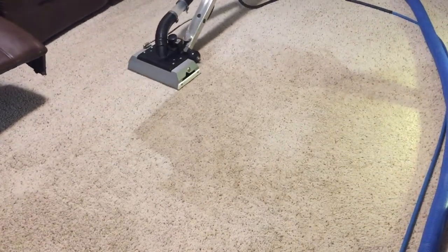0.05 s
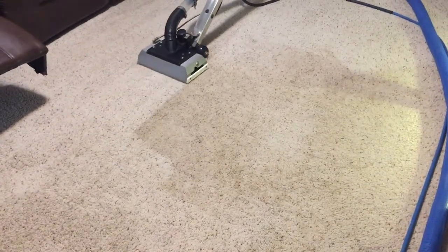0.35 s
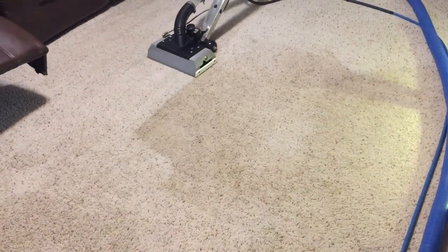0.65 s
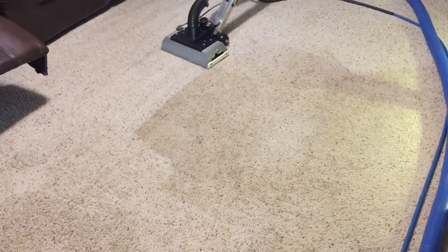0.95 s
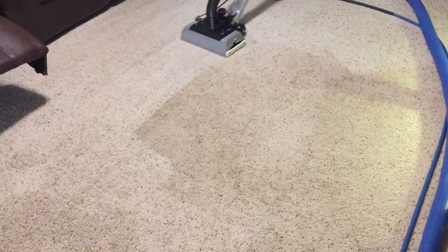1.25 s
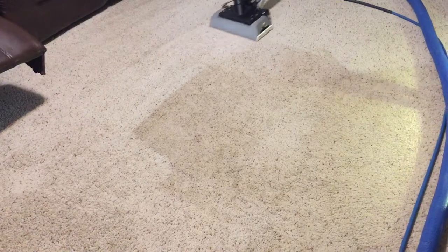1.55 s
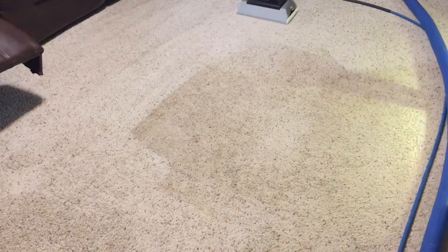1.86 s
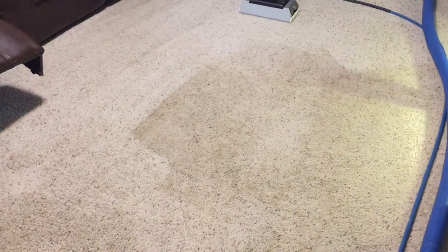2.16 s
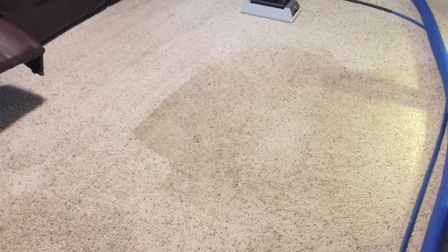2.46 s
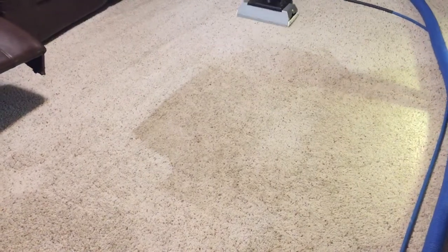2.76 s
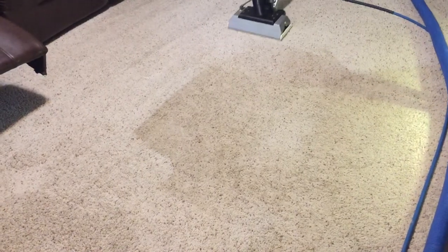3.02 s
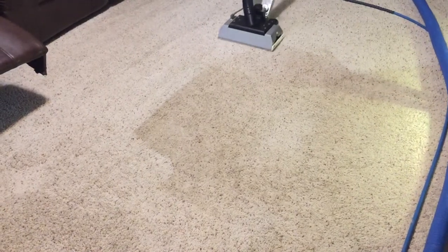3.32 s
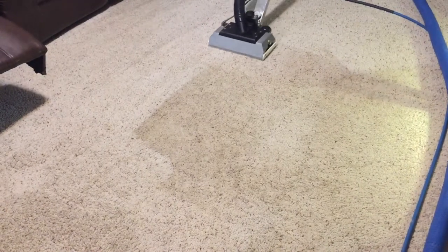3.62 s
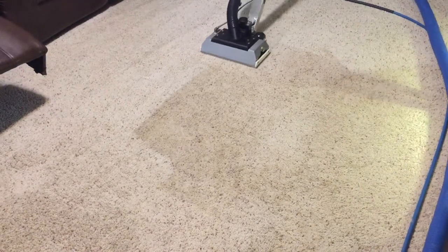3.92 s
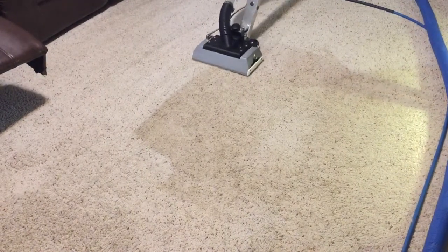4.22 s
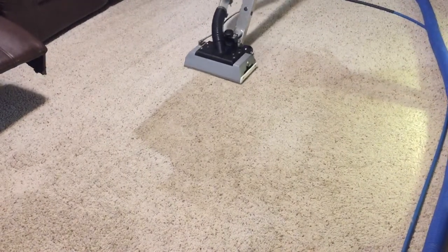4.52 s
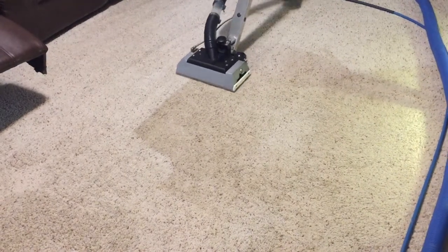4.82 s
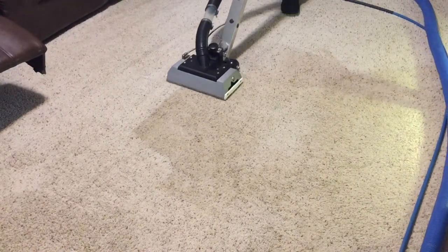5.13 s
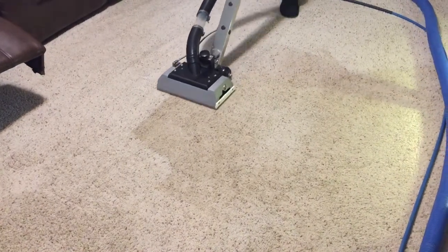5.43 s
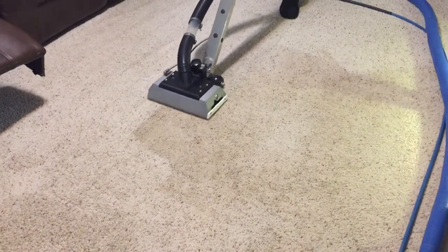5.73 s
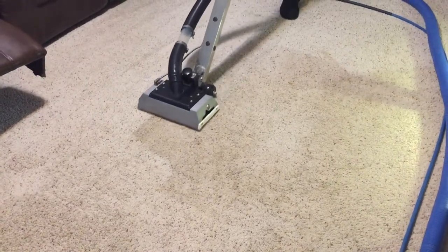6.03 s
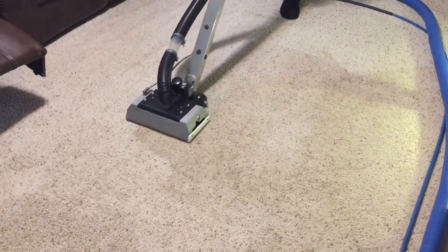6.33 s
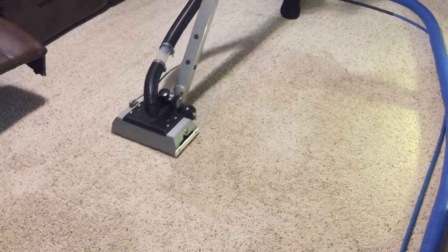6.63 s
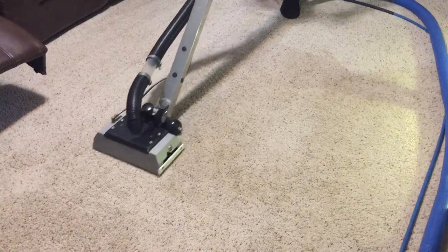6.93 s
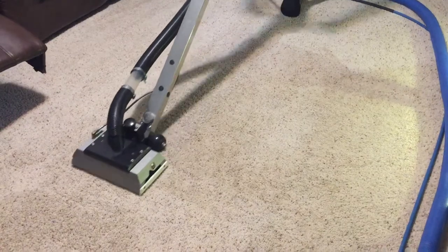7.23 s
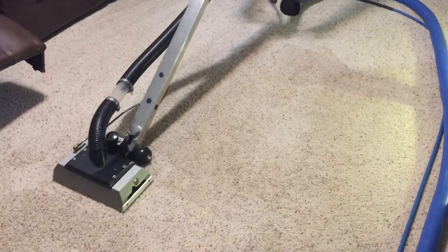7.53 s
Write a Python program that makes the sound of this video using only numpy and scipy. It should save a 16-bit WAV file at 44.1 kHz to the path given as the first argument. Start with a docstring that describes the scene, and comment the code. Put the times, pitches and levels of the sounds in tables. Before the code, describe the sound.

A carpet cleaning machine runs indoors with a loud, steady, throbbing motor hum. High turbine whines swell and fade above it, while air roars into the wand with a fine spray hiss and thin whistles. About two seconds in, the suction chokes briefly on the carpet, then breaks through in two quick slurps. Near the end a faint low groan joins as the head comes closer. Heard from one spot in the room.

```python
"""A carpet extractor's pump motor hums loudly, throbbing against the shake of the brush drive.
Three vacuum turbines whine, swelling and fading in the room, over a faint cooling fan.
Air roars into the nozzle with a fine spray and thin whistles as the wand is drawn back. It chokes as
the nozzle seals on the pile, then breaks through in two slurps as the wand is pushed towards the
listener. A low groan rises as the head comes near."""
import sys
import numpy as np
from scipy import signal
from scipy.fft import rfft, irfft, next_fast_len
from scipy.io import wavfile
from scipy.ndimage import uniform_filter1d, map_coordinates

SR = 44100
rng = np.random.default_rng(int(sys.argv[2]) if len(sys.argv) > 2 else 0)


def wav_out(sig):
    """Save sig, one row per channel (or a flat mono array), as 16-bit PCM at SR to the path in sys.argv[1]."""
    wavfile.write(sys.argv[1], SR, np.round(np.clip(np.atleast_2d(sig).T, -1, 1) * 32767).astype(np.int16))


N = 342657
TIME = np.arange(N) / SR

# the wand's stroke (time [s], distance of the head [m])
STROKE = [(0, 2.3), (1, 2.5), (2.1, 3.2), (2.75, 3.6), (4, 2.14), (6.5, 1.9), (7.5, 1.38), (7.77, 1.5)]
# faint partials of the hum
# (multiple of its pitch, level at mid stroke [dB], gain per halving of distance [dB], fade depth [dB])
HUM_PARTIALS = [(.5, -50, 5, 1.5), (2, -50, 2, 1.0), (3, -45.5, -3, 1.86), (3.5, -62, -3, 0),
                (4, -52, 10.5, 1.8), (5, -55, 5, 1.5)]
# brush drive partials (multiple of the turning rate, level [dB])
BRUSH_PARTIALS = [(5, -49), (6, -59), (8, -38), (10, -53), (11, -42.5), (13, -54.5), (14, -59.5),
                  (16, -51.5), (18, -53.5), (19, -62.5), (21, -40.5), (22, -40.5), (23, -50), (24, -50.5),
                  (25, -58.5)]
# shared swell of the main and third turbines' blade tones (time [s], base level [dB])
BLADE_SWELL = [(0, -49), (.4, -57), (.8, -49), (2.5, -48.5), (3.5, -51.5), (4.8, -55), (5.35, -50.5),
               (6.15, -58), (6.85, -48), (7.77, -49.5)]
# the main turbine's whine, an octave above its blade tone (time [s], base level [dB])
WHINE_SWELL = [(0, -55), (.6, -52), (1.17, -44.5), (1.3, -53), (1.57, -41.5), (1.95, -60), (2.23, -44.5),
               (2.85, -43), (3.05, -66), (3.32, -39), (3.55, -60), (3.72, -44.5), (4.2, -58), (4.95, -46.5),
               (5.5, -45), (6.15, -46), (7.45, -45), (7.72, -41)]
# turbine harmonics (multiple of the blade tone, base level [dB])
MAIN_OVERTONES = [(3, -60.5), (5, -55), (6, -71), (8, -67.5), (10, -68)]
SECOND_PARTIALS = [(1, -52.5), (2, -53), (3, -64.5), (4, -65.5)]
THIRD_OVERTONES = [(2, -56.5)]
# the fan tone rings out (start [s], time until release [s], boost [dB])
FAN_SWELLS = [(1.136, 0.43, 8), (3.5, 0.36, 9), (4.95, 0.22, 8), (7.4, 0.17, 8)]
# EQ curves of the air layers, dark to bright (frequency [Hz], relative level [dB])
BOOM_EQ = [(25, -25), (36, -17), (46, -10.5), (70, -2.5), (110, -6.5), (160, -3), (205, -3.5), (250, -1.5),
           (282, 1), (320, -7), (390, -6.5), (490, -15), (650, -15.5), (1000, -39)]
ROAR_EQ = [(350, -28), (520, -8), (620, 0.5), (1000, -2), (1500, -1.5), (2000, -2), (2500, -6), (3500, -18)]
RUSH_EQ = [(1500, -14.5), (2100, -0.5), (2600, -1), (3400, 0), (3900, -2), (4500, -3), (4900, -7),
           (5400, -5.5), (6500, -17.5), (8000, -25)]
HISS_EQ = [(4200, -19), (5000, -9.5), (5500, -1), (6600, 0.5), (7200, -2), (7750, -4), (8400, -3.5),
           (9500, -12.5), (10400, -16)]
SPRAY_EQ = [(7000, -24), (7800, -7), (8500, 3), (9600, 3), (10000, -0.5), (10400, -3.5), (11100, 0.5),
            (12500, -1), (14200, -1), (15700, -3.5), (17000, -9)]
# fader ride of the spray (time [s], base level [dB])
SPRAY_LEVEL = [(0, -44.3), (1.1, -46), (2.05, -46), (2.5, -44), (4.1, -45), (5.7, -43), (7.77, -45)]
# nozzle whistles (start [s], time until release [s], pitch [Hz], level [dB])
WHISTLES = [(1.85, .85, 950, -50.5), (3.2, 0.63, 933, -50), (4.717, 0.66, 968, -48.5),
            (5.45, 1.7, 955, -51.5)]
# wet air bursting through the nozzle
# (peak time [s], half length [s], air level [dB], centre [Hz], width [Hz], gurgle level [dB])
SLURPS = [(2.845, 0.042, -33.5, 1750, 2900, -42), (3.006, 0.038, -35.7, 3870, 5060, -47)]
# the low groan (time [s], pitch [Hz], level [dB])
GROAN = [(6.1, 85, -75), (6.35, 80.7, -51), (6.65, 71, -57), (6.85, 63, -39), (7, 58.7, -44),
         (7.15, 54.4, -41), (7.35, 55.7, -35.5), (7.5, 63.2, -47), (7.77, 67, -44)]

MID_STROKE_M, WAND_M_PER_S = 2.2, 0.35  # the head's usual distance and pace
FADES_PER_S = 3.9  # how fast the room's standing waves shift


def undb(db):
    """Decibels to gain."""
    return np.exp(np.asarray(db) * (np.log(10) / 20))


def unit(x):
    """Scale to rms 1."""
    return x / np.sqrt(np.mean(x ** 2))


def curve(table, column=1):
    """One column of a timed table as an automation curve."""
    columns = np.transpose(table)
    return np.interp(TIME, columns[0], columns[column])


def walk(rate):
    """Smooth random modulation, rms 1, moving about rate times a second."""
    step = int(SR / rate)
    held = np.repeat(rng.standard_normal(N // step + 2), step)
    return unit(uniform_filter1d(uniform_filter1d(held, step), step)[:N])


def swell(start, length, attack=0.14, release=0.16):
    """An envelope from 0 to 1 and back; the release begins length seconds after the start."""
    return np.clip(np.minimum((TIME - start) / attack, 1 - (TIME - start - length) / release), 0, 1)


def nearness():
    """How many times the head's distance has halved relative to mid stroke."""
    return np.log2(MID_STROKE_M / curve(STROKE))


def pace():
    """The wand's speed: -1 at rest, 0 at its usual pace, 1 at twice that."""
    speed = np.abs(np.gradient(curve(STROKE))) * SR
    return uniform_filter1d(speed, size=SR // 5) / WAND_M_PER_S - 1


def colour(x, eq):
    """Shape a sound with an EQ curve; rms 1."""
    hz, db = np.transpose(eq)
    size = next_fast_len(N)
    bin_hz = np.maximum(np.arange(size // 2 + 1) * SR / size, 1)
    gain = undb(np.interp(np.log(bin_hz), np.log(hz), db, left=db[0], right=-90))
    return unit(irfft(rfft(x, size) * gain, size)[:N])


def resonate(x, hz, width_hz):
    """Two passes through a broad resonance; rms 1."""
    b, a = signal.iirpeak(hz, hz / width_hz, fs=SR)
    return unit(signal.lfilter(b, a, signal.lfilter(b, a, x)))


def tone(hz):
    """A sine of rms 1 that follows a pitch."""
    return np.sqrt(2) * np.sin(2 * np.pi * (np.cumsum(hz + np.zeros(N)) / SR + rng.random()))


def wavering(hz, db, jitter_hz, flutter_db):
    """A tone unsteady in pitch and level."""
    return undb(db + flutter_db * walk(16)) * tone(hz + jitter_hz * walk(20))


def fading(partials, fade_db):
    """Each partial swells and fades on its own as the room's standing waves shift."""
    return [(k, db + fade_db * walk(FADES_PER_S)) for k, db in partials]


def rotor(hz, partials, jitter_hz, flutter_db):
    """Blade harmonics on one shaft; the air flow shakes their pitch and level."""
    hz = hz + jitter_hz * walk(25)
    return sum(undb(db + flutter_db * walk(25)) * tone(k * hz) for k, db in partials)


def wet_air(drops_per_s, drop_share):
    """Turbulence with tiny droplet ticks in it."""
    ticks = (rng.random(N) < drops_per_s / SR) * rng.standard_normal(N)
    return rng.standard_normal(N) + drop_share * unit(ticks)


def pump(pitch_hz=184.62, drift_hz=0.19, hum_db=-14, hum_near_db=-0.2):
    """A nearly pure hum, drifting with the load; its faint partials change with the head's place."""
    hz = pitch_hz + drift_hz * walk(1.5)
    near = nearness()
    partials = sum(undb(db + near_db * near + fade_db * walk(FADES_PER_S)) * tone(k * hz)
                   for k, db, near_db, fade_db in HUM_PARTIALS)
    return undb(hum_db + hum_near_db * near) * tone(hz) + partials


def brush(turns_per_s=9.135, drift=0.0005, unsteady_db=0.67):
    """The drive shakes the head on every turn; its partials beside the hum make that throb."""
    hz = turns_per_s * (1 + drift * walk(0.89))
    return sum(undb(db + unsteady_db * walk(5)) * tone(k * hz) for k, db in BRUSH_PARTIALS)


def turbines(main_hz=1125.7, second_hz=1001.5, third_hz=1103.6, drift_hz=0.99, near_db=4):
    """Three vacuum turbines whine at close speeds; the main one brightens as the head nears."""
    blade_db = curve(BLADE_SWELL)
    lift_db = 0.3 * (blade_db - blade_db.mean()) + near_db * nearness()  # partly rides the blade swell
    overtones = [(k, db + lift_db) for k, db in MAIN_OVERTONES]
    main = [(1, blade_db - 0.5), (2, curve(WHINE_SWELL) + 0.7)] + fading(overtones, fade_db=1.5)
    third = [(1, blade_db)] + fading(THIRD_OVERTONES, fade_db=1.8)
    out = rotor(main_hz + drift_hz * walk(1.2), main, jitter_hz=1.4, flutter_db=2.0)
    out += rotor(second_hz, fading(SECOND_PARTIALS, fade_db=0.9), jitter_hz=1.79, flutter_db=2.5)
    return out + rotor(third_hz, third, jitter_hz=1.29, flutter_db=2.2)


def fan(hz=1345.5, base_db=-55):
    """The cooling fan's one tone, mostly buried in the roar, rings out now and then."""
    boost_db = sum(db * swell(start, length) for start, length, db in FAN_SWELLS)
    blade = fading([(1, base_db + boost_db)], fade_db=1.0)
    return rotor(hz, blade, jitter_hz=4.84, flutter_db=2.5)


def suction(gust_db=0.26, surge_db=0.47, flicker_db=0.74):
    """Air booms and roars in the hose, rushes under the nozzle and hisses, wet, through its slot."""
    near, fast = nearness(), pace()
    gust = gust_db * walk(14)

    def airflow(eq, db, near_db, pace_db, duck_db, hold_s):
        """One band of wet air: louder as the head nears, ducked while the nozzle is sealed."""
        level = db + near_db * near + pace_db * fast - duck_db * choke(hold_s)
        air = colour(wet_air(drops_per_s=2500, drop_share=0.38), eq)
        return undb(level + gust + surge_db * walk(10) + flicker_db * walk(45)) * air

    boom_db = -42.5 + 0.3 * fast + walk(3) + gust
    boom = undb(boom_db) * colour(rng.standard_normal(N), BOOM_EQ)
    # after the choke the hiss returns first, the roar last
    roar = airflow(ROAR_EQ, db=-40.9, near_db=0.5, pace_db=0.35, duck_db=3.3, hold_s=0.27)
    rush = airflow(RUSH_EQ, db=-41.5, near_db=1.3, pace_db=0, duck_db=4.5, hold_s=0.2)
    hiss = airflow(HISS_EQ, db=-44, near_db=0.3, pace_db=0, duck_db=2.3, hold_s=0.04)
    return boom + roar + rush + hiss


def spray(sizzle_hz=11500, near_db=2.5, surge_db=0.25, flicker_db=0.94):
    """Fine spray; its highest sizzle beams forward and grows as the head nears."""
    mist = colour(wet_air(drops_per_s=2500, drop_share=0.3), SPRAY_EQ)
    sizzle = signal.sosfiltfilt(signal.butter(4, sizzle_hz, "high", fs=SR, output="sos"), mist)
    body = undb(flicker_db * walk(45)) * (mist - sizzle)
    top = undb(near_db * nearness() + flicker_db * walk(45)) * sizzle
    return undb(curve(SPRAY_LEVEL) + surge_db * walk(10)) * (body + top)


def bounce(x, lag_s, sway_s, share):
    """One reflection with a wandering path gently flanges the air."""
    lag = lag_s + sway_s * walk(1.5)
    late = map_coordinates(x, [np.arange(N) - lag * SR], order=3)
    return (x + share * late) / np.hypot(1, share)


def whistles(wander_hz=4):
    """Air catches an edge of the nozzle and sings for a while."""
    return sum(swell(start, length) * wavering(hz + wander_hz * walk(2), db, jitter_hz=2.9, flutter_db=1.8)
               for start, length, hz, db in WHISTLES)


def choke(hold_s, start_s=2.06, attack_s=0.13):
    """The nozzle seals on the pile and lets go: 0 open, 1 sealed."""
    return swell(start_s, attack_s + hold_s, attack_s, release=0.2)


def seal_leak(db=-52):
    """A thin, high hiss of air squeezed past the sealed nozzle."""
    return undb(db) * choke(hold_s=0.23) * resonate(rng.standard_normal(N), hz=11700, width_hz=1500)


def slurps(sputter_db=1.0):
    """The nozzle lifts off the wet pile and gulps air and water, which gurgle down the hose."""
    out = 0
    for peak_s, half_s, air_db, hz, width_hz, gurgle_db in SLURPS:
        air = resonate(wet_air(drops_per_s=1300, drop_share=0.75), hz, width_hz)
        gurgle = resonate(wet_air(drops_per_s=170, drop_share=0.53), hz=520, width_hz=650)
        gulp = undb(air_db) * air + undb(gurgle_db) * gurgle
        envelope = np.exp(-0.5 * ((TIME - peak_s) / half_s) ** 2)
        out += undb(sputter_db * walk(90)) * envelope * gulp
    return out


def groan():
    """A low, wavering tone sags in pitch and lifts again as the head comes near."""
    return wavering(hz=curve(GROAN), db=curve(GROAN, column=2), jitter_hz=1.66, flutter_db=2.0)


def scene():
    """Machine and wand in mono, heard from one spot."""
    nozzle = suction() + seal_leak() + spray() + slurps()
    air = bounce(nozzle, lag_s=0.0023, sway_s=0.00016, share=0.15)
    low_groan = groan()
    machine = pump() + brush() + turbines() + fan()
    return (machine + air + whistles() + low_groan)[None]


def record(dry):
    """A steep high cut on the whole mix."""
    cutoff_hz = 15800
    return signal.sosfilt(signal.ellip(12, 0.1, 90, cutoff_hz, fs=SR, output="sos"), dry)


dry = scene()
out = record(dry)
wav_out(out)
```